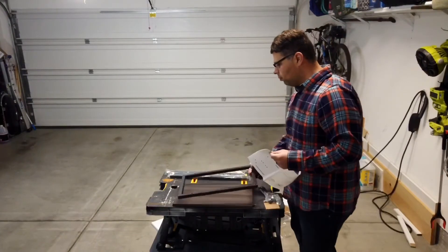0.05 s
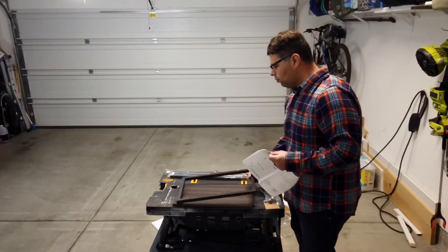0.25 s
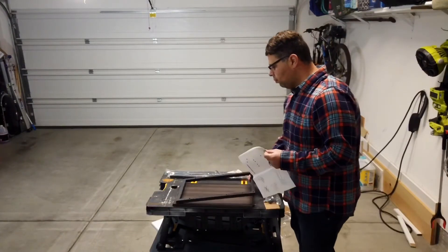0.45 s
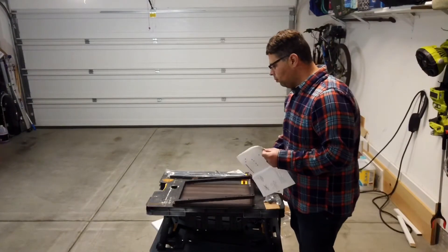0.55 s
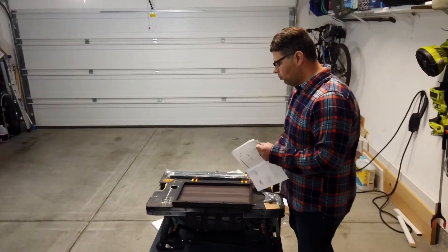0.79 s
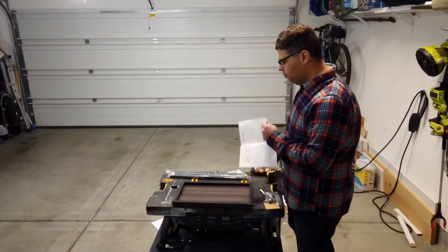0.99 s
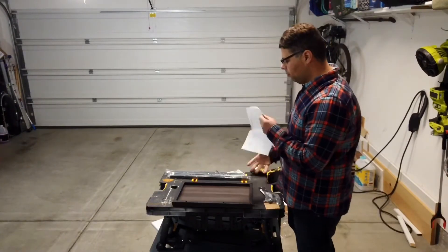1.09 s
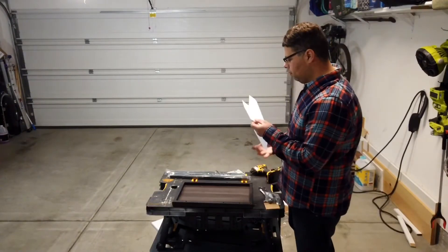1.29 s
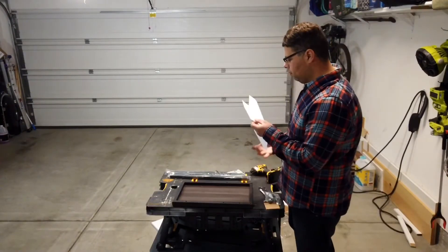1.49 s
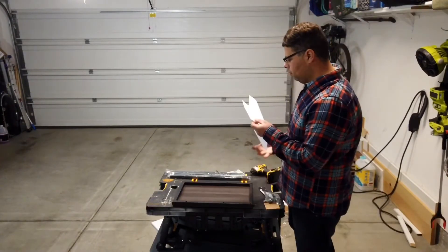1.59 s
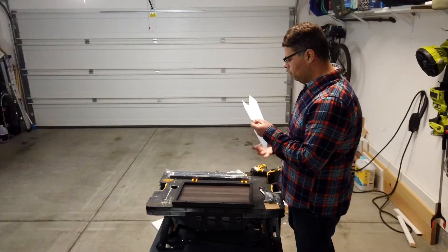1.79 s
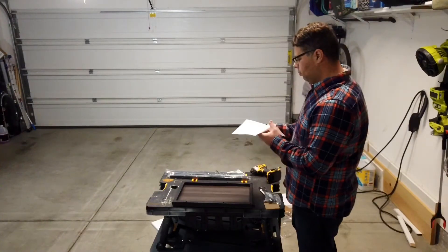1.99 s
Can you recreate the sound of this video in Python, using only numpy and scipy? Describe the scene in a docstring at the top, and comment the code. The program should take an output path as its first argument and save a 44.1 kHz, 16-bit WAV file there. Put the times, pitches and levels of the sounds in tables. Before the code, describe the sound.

Hard metallic clacks as a steel frame lands on a bench, followed by light paper snaps

```python
"""A closed garage: a steel frame is lowered by one hand onto a panel lying on a workbench.
It knocks twice, then drops flat and clatters: coloured noise bursts make clacks, thuds and edge ticks,
and decaying sines make the tubes and bench ring. A paper leaflet rustles in sparse clicks and snaps in
short bursts, sharpest near the end. Soft shuffling, air, rumble and faint hum lie beneath;
decaying diffuse noise gives the frame and the handling a room to ring into."""
import sys
import numpy as np
from scipy import signal
from scipy.fft import rfft, irfft, next_fast_len
from scipy.io import wavfile
from scipy.ndimage import uniform_filter1d

SR = 44100
rng = np.random.default_rng(int(sys.argv[2]) if len(sys.argv) > 2 else 0)


def waveform_to_disk(signal):
    """Save audio, clipped to [-1, 1], as 16-bit WAV at the path in sys.argv[1]."""
    frames = np.transpose(np.atleast_2d(signal))
    scaled = np.clip(frames, -1, 1) * 32767
    samples = np.round(scaled).astype(np.int16)
    wavfile.write(sys.argv[1], SR, samples)


N = 90404
T = np.arange(N) / SR   # seconds
SIZE = next_fast_len(2 * N, True)   # padded, so filters do not wrap around
HZ = np.maximum(np.fft.rfftfreq(SIZE, 1 / SR), 1)


def from_db(db):
    """Turn decibels into amplitude gain."""
    return 10 ** (np.asarray(db) / 20)


def at_hz(points, hz):
    """Read a table between its rows on a log-frequency axis."""
    table_hz, value = np.transpose(points)
    return np.interp(np.log(hz), np.log(table_hz), value)


def level(points):
    """Draw a gain over time from rows of seconds and dB."""
    return from_db(np.interp(T, *np.transpose(points)))


def filtered(x, response):
    """Apply a frequency response and keep the scene's length."""
    return irfft(rfft(x, SIZE) * response)[..., :N]


def colour(points):
    """Causal, minimum-phase response of unit power that follows a spectrum."""
    gain = from_db(at_hz(points, HZ))
    unit_gain = gain / np.sqrt(np.mean(gain ** 2))
    cepstrum = irfft(np.log(unit_gain))
    # folding the cepstrum onto positive time makes the response causal
    cepstrum[1:SIZE // 2] *= 2
    cepstrum[SIZE // 2 + 1:] = 0
    return np.exp(rfft(cepstrum))


def diffuse():
    """Stereo noise, alike on both sides in the bass and wide in the treble."""
    # Width of the diffuse sound. Each row: frequency in Hz, side minus mid in dB.
    width = [(100, -17.5), (200, -44), (400, -25), (700, -4.5), (1400, -2), (3000, -1.5), (10000, -1.5)]
    mid, side = rng.standard_normal((2, N))
    side = filtered(side, from_db(at_hz(width, HZ)))
    return np.array([mid + side, mid - side]) / np.sqrt(2)


def softness(hz, bright_hz):
    """The softer a contact, the less treble it carries."""
    leak_db = -42   # share of the sharp edge that even a soft contact keeps
    low_pass_power = 1 / (1 + (hz / bright_hz) ** 6)
    return np.sqrt(low_pass_power + from_db(leak_db) ** 2)


def burst(t60):
    """Spectrum of dying noise, evened in colour: a thicket of short resonances."""
    dying_noise = rng.standard_normal(N) * from_db(-60 * T / max(t60, .003))
    spectrum = rfft(dying_noise, SIZE)
    local_power = uniform_filter1d(abs(spectrum) ** 2, size=1600)
    return spectrum / np.sqrt(local_power + 1e-12)


def delay(s):
    """Phase turn that moves a sound to s seconds."""
    return np.exp(-2j * np.pi * HZ * s)


def strike(s, db, bright_hz, t60):
    """Spectrum of one contact: a noise burst dulled by its softness."""
    return from_db(db) * softness(HZ, bright_hz) * burst(t60) * delay(s)


def ring(pitches, modes, s, db, bright_hz, rise_s):
    """Modes swell briefly after a blow and die away; a soft blow excites the high ones less."""
    t = np.maximum(T - s, 0)
    swell = 1 - np.exp(-t / rise_s)
    tones = 0
    for hz, (mode_db, t60) in zip(pitches, modes):
        decay = from_db(db + mode_db - 60 * t / t60)
        tones = tones + softness(hz, bright_hz) * decay * np.sin(2 * np.pi * hz * t)
    return swell * tones


def garage(x):
    """Reverberation: a diffuse noise tail that dies at its own rate in each octave."""
    # Decay of the garage. Each row: frequency in Hz, t60 in seconds.
    garage_t60 = [(100, 0.15), (300, 0.54), (900, 0.64), (2600, 0.6), (5400, 0.76), (11000, 0.21)]
    garage_db, build_s, first_echo_s = 3.5, 0.0041, 0.0016
    noise, tail = rfft(diffuse(), SIZE), 0
    for octave in range(6, 15):
        # triangular bands that crossfade between octaves, 64 Hz to 16 kHz
        share = np.maximum(1 - abs(np.clip(np.log2(HZ), 6, 14) - octave), 0)
        t60 = at_hz(garage_t60, 2.0 ** octave)
        even_energy = np.sqrt(2 * np.log(1000) / (t60 * SR))   # long decays are no louder overall
        tail = tail + irfft(noise * share)[:, :N] * from_db(-60 * T / t60) * even_energy
    build = 1 - np.exp(-np.maximum(T - first_echo_s, 0) / build_s)
    return from_db(garage_db) * filtered(x, rfft(tail * build, SIZE))


def background():
    """Room air and an uneven deep rumble from coloured noise, and a steady hum of sines."""
    # Tones of the hum. Each row: frequency in Hz, level in dB rms.
    hum_tones = [(119, -78), (298, -79), (462.5, -69), (651, -75.5), (1701, -74.5)]
    # Spectrum of the air. Each row: frequency in Hz, relative density in dB per Hz.
    air_colour = [(30, 1), (100, -0.5), (180, -12.5), (400, -7.5), (750, -3), (1300, -10), (1800, -13),
                  (3000, -14.5), (5000, -31), (10000, -53), (15000, -57)]
    # Swells of the rumble. Each row: time in seconds, level in dB.
    rumble_level = [(0, -59), (.9, -55.5), (1.05, -84), (1.2, -53), (1.38, -66), (1.6, -62.5), (1.85, -62),
                    (2.05, -57)]
    # Spectrum of the rumble. Each row: frequency in Hz, relative density in dB per Hz.
    rumble_colour = [(15, -23), (28, -2.5), (50, -9), (100, -17), (250, -32), (1000, -83)]
    air_db = -59.5
    hum = sum(np.sqrt(2) * from_db(db) * np.sin(2 * np.pi * (hz * T + rng.random()))
              for hz, db in hum_tones)
    air = from_db(air_db) * filtered(diffuse(), colour(air_colour))
    rumble = level(rumble_level) * filtered(diffuse(), colour(rumble_colour))
    return hum + air + rumble


def shuffle():
    """Dull, soft rubbing as things shift at the bench: noise that swells and fades."""
    # Swells of the rubbing. Each row: time in seconds, level in dB before the mix.
    shuffle_level = [(0, -57), (.085, -62.5), (.095, -45), (.13, -60.5), (.2, -50), (.3, -58), (1.3, -72),
                     (1.45, -60), (1.55, -84), (1.73, -64.5), (1.76, -52.5), (1.88, -69.5), (1.95, -58),
                     (2.05, -71.5)]
    # Spectrum of the rubbing. Each row: frequency in Hz, relative density in dB per Hz.
    shuffle_colour = [(120, -4), (400, -9), (720, 4), (1250, -10.5), (1800, -3), (3000, -11.5),
                      (6000, -29.5)]
    return filtered(rng.standard_normal(N) * level(shuffle_level), colour(shuffle_colour))


def paper():
    """Tiny creases give way in uneven clumps; now and then the sheet flexes and snaps."""
    # Swells of the rustle. Each row: time in seconds, level in dB before the mix.
    rustle_level = [(0, -76), (.2, -74.5), (.6, -59), (1.1, -94), (1.28, -78), (1.39, -67.5), (1.42, -60),
                    (1.47, -66), (1.52, -54), (1.57, -70), (1.65, -71), (1.72, -55), (1.77, -84),
                    (1.85, -80), (1.94, -75), (2.05, -113)]
    # Spectrum of the rustle. Each row: frequency in Hz, relative density in dB per Hz.
    rustle_colour = [(300, -15), (700, -18), (1200, -25), (1900, 0.5), (2800, 3.5), (4500, -6.5),
                     (9500, -9.5), (11500, -7.5), (15000, -25)]
    # The leaflet flexes. Each row: start in seconds, level in dB before the mix, brightness in Hz.
    flicks = [(1.17, -25.5, 2570), (1.196, -24.5, 2980), (1.410, -24, 3580), (1.507, -48, 12000),
              (1.599, -23.5, 3740), (1.670, -29, 6000), (1.736, -17.5, 9400), (1.742, -24, 7000),
              (1.762, -42, 5000)]
    # Spectrum of the snaps. Each row: frequency in Hz, relative density in dB per Hz.
    snap_colour = [(300, -6), (1200, -15.5), (1900, 1), (3500, 1), (4800, -5), (7500, -3), (11000, -2.5),
                   (14000, -27)]
    creases_per_s, crease_spread_db = 1500, 3
    clumps_per_s, clump_spread_db = 39, 2.5
    snap_t60_s = 0.031

    # mostly small creases, a few large, of either sign
    sizes = from_db(crease_spread_db * np.minimum(rng.exponential(1, N), 5)) * rng.choice([-1, 1], N)
    unevenness = np.interp(T * clumps_per_s, np.arange(N), rng.standard_normal(N))
    clumps = from_db(clump_spread_db * unevenness)
    creases = sizes * clumps * (rng.random(N) < creases_per_s / SR)
    rustle = filtered(creases / creases.std() * level(rustle_level), colour(rustle_colour))

    snaps = irfft(sum(strike(s, db, hz, snap_t60_s) for s, db, hz in flicks))[:N]
    return rustle + filtered(snaps, colour(snap_colour))


def ticks():
    """Short bright cracks as bare steel edges land: noise bursts with a fixed colour."""
    # Edges that land. Each row: start in seconds, level in dB.
    landings = [(0.2334, -11), (.304, -22.5), (.463, -13.5), (0.676, -15)]
    # Spectrum of a tick. Each row: frequency in Hz, relative density in dB per Hz.
    tick_colour = [(1500, -27), (3000, 0.5), (4200, 4), (4700, -12.5), (5600, -4.5), (7000, -14.5),
                   (9500, -9.5), (12000, -23.5), (15500, -35)]
    tick_t60_s = 0.034
    cracks = sum(from_db(db) * burst(tick_t60_s) * delay(s) for s, db in landings)
    return irfft(cracks * colour(tick_colour))[:N]


def tube():
    """A brief pitched clack as the long tube bends when its end is knocked."""
    # Knocks that flex the tube. Each row: start in seconds, strength in dB.
    flexes = [(0.2331, -4), (0.2398, -2.5), (.3045, -8.5), (0.4654, -0.5), (0.676, -1)]
    # Short bending modes. Each row: pitch in Hz, level in dB relative to the knock, t60 in seconds.
    tube_modes = [(1410, -42, 0.072), (1527, -20, 0.076), (1863, -17.5, 0.055), (2038, -30, 0.11)]
    rise_s, bright_hz = 0.0013, 5000
    pitches = [row[0] for row in tube_modes]
    modes = [row[1:] for row in tube_modes]
    return sum(ring(pitches, modes, s, db, bright_hz, rise_s) for s, db in flexes)


def ringing():
    """Blows set off long modes of bench and frame, and the bench swaying on its legs."""
    # Blows to the whole bodies. Each row: start in seconds, strength on bench modes in dB,
    # on frame modes in dB, on bench sway in dB, brightness in Hz.
    blows = [(.241, -0.5, -17, -2, 1800), (.467, -9, -10, -2, 2270), (.683, -10.5, 0.5, -1.5, 7940)]
    # Pitches of the bench modes in Hz.
    bench_hz = [160, 183, 240.7, 297.6, 422.2, 478, 602.4, 647, 735, 763]
    # Bench modes, in pitch order. Each row: level in dB relative to the blow, t60 in seconds.
    bench_modes = [(-49.5, 0.68), (-30.5, 0.57), (-34, 0.8), (-32, 0.42), (-20.5, 0.64), (-33.5, 0.96),
                   (-36.5, 0.42), (-42, 0.39), (-33.5, 0.72), (-26.5, 0.45)]
    # Pitches of the frame modes in Hz.
    frame_hz = [267, 299, 716.7, 879, 1353.7, 1510, 1733, 1794, 3134.5, 3533, 3629, 4941, 5221, 7390, 10405]
    # Frame modes, in pitch order. Each row: level in dB relative to the blow, t60 in seconds.
    frame_modes = [(-38, 0.64), (-26.5, 0.48), (-26.5, 0.36), (-26, 0.47), (-29, 0.66), (-38, .55),
                   (-31.5, 0.2), (-28, 0.53), (-32.5, 0.6), (-31, 0.42), (-29, 0.26), (-32.5, 0.4),
                   (-45.5, 0.79), (-37, 0.41), (-33, 0.44)]
    # Pitches of the frame's least damped modes in Hz.
    singing_hz = [3095, 3440]
    # Least damped modes, in pitch order. Each row: level in dB relative to the blow, t60 in seconds.
    singing_modes = [(-45, 1.7), (-47, 1.2)]
    ring_rise_s, sway_rise_s = 0.0027, 0.01
    sway_hz, sway_mode = 58.6, (-41, 0.49)   # level in dB relative to the blow, t60 in seconds

    pitches = list(frame_hz) + list(singing_hz)
    modes = list(frame_modes) + list(singing_modes)
    total = 0
    for s, bench_db, frame_db, sway_db, bright_hz in blows:
        total = total + ring(bench_hz, bench_modes, s, bench_db, bright_hz, ring_rise_s)
        total = total + ring(pitches, modes, s, frame_db, bright_hz, ring_rise_s)
        total = total + ring([sway_hz], [sway_mode], s, sway_db, bright_hz, sway_rise_s)
    return total


def knocks(contacts):
    """Each contact in one share makes the tubes clack and the bench top thud into the room."""
    # Dense resonances of the tubes. Each row: frequency in Hz, relative density in dB per Hz.
    clack_colour = [(200, -29), (600, -13), (1050, -8), (1500, -1.5), (1950, -3.5), (2300, -7.5),
                    (2900, -9.5), (3500, -11), (4500, -19), (7500, -17), (10500, -18), (15000, -31.5)]
    # Dense resonances of the bench top. Each row: frequency in Hz, relative density in dB per Hz.
    thud_colour = [(60, -28), (105, -8.5), (165, -3), (300, -1.5), (450, 0.5), (780, -3), (1200, -5.5),
                   (2500, -23), (6000, -80)]
    clack_db, clack_t60_s = 3, 0.077
    thud_db, thud_t60_s = 3.5, 0.078
    clacks = sum(strike(s, clack_db + db, hz, clack_t60_s) for s, db, _, hz in contacts)
    thuds = sum(strike(s, thud_db + db, hz, thud_t60_s) for s, _, db, hz in contacts)
    clack = irfft(colour(clack_colour) * clacks)[:N]
    thud = irfft(colour(thud_colour) * thuds)[:N]
    direct = clack + thud
    return direct + garage(direct)


def scene():
    """Mix frame, bench and paper in the garage."""
    # The frame touches down. Each row: start in seconds, tube clack in dB and bench thud in dB
    # (each relative to the overall clack or thud level), brightness in Hz.
    contacts = [(.2335, 0.5, -4.5, 2120), (.240, 4, -5.5, 1570), (.246, -24, 1, 930),
                (.272, -13, -11.5, 1740), (.304, -1.5, -5, 2010), (.316, -12, -9.5, 1680),
                (.345, -7, -7, 1540), (0.373, -10, -9.5, 1200), (.463, -1.5, -11.5, 3800),
                (.4675, -2.5, -10.5, 2240), (0.483, -4.5, -6, 2560), (.499, -12, -2, 1470),
                (.522, -9, -8.5, 1770), (.6735, -3, -11.5, 12100), (.680, 2.5, -2, 5560),
                (.700, -2, -1, 7960), (.709, 0, -4, 8100), (.720, -0.5, -2, 5560), (.737, 0, -4.5, 4000),
                (.752, -6.5, -15, 2980)]
    shares = 3   # contacts are shared in turn among three independent diffuse tails
    paper_direct_db, tick_room_db = -0.5, -2.5
    frame = sum(knocks(contacts[first::shares]) for first in range(shares))
    frame = frame + ringing() + tube()
    handling, edges = paper() + shuffle(), ticks()
    direct = frame + edges + from_db(paper_direct_db) * handling
    room = garage(handling + from_db(tick_room_db) * edges)
    return direct + room + background()


def record(dry):
    """The right microphone lags a little; the top is cut steeply."""
    # Phase by which left leads right. Each row: frequency in Hz, lead in radians.
    left_lead = [(170, 0), (300, 0.29), (450, .5), (620, 0.78), (800, 1.32), (1400, 1.14), (2500, 1.62),
                 (5000, 1.66), (12000, 2)]
    cutoff_hz = 15750
    right = filtered(dry[1], np.exp(-1j * at_hz(left_lead, HZ)))
    pair = np.array([dry[0], right])
    steep_cut = signal.ellip(10, .1, 80, cutoff_hz, fs=SR, output="sos")
    return signal.sosfilt(steep_cut, pair)


dry = scene()
out = record(dry)
waveform_to_disk(out)
```